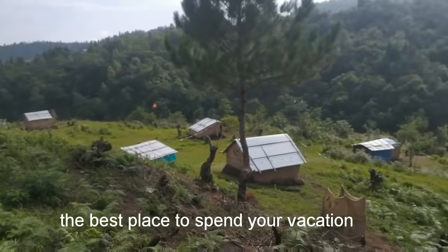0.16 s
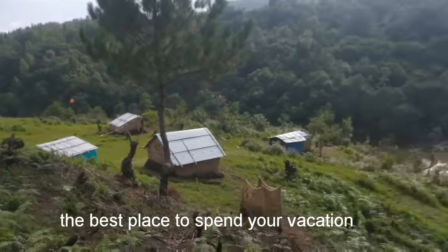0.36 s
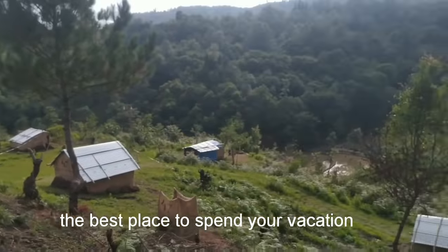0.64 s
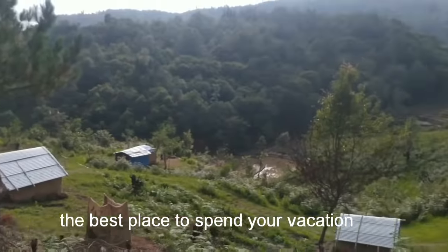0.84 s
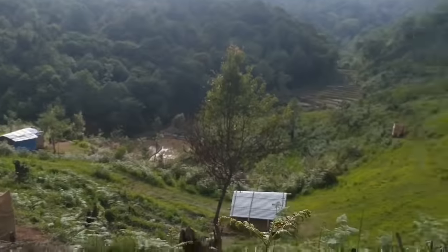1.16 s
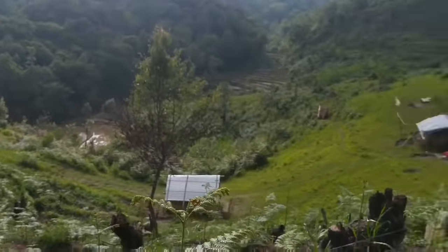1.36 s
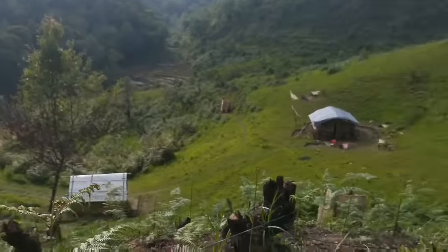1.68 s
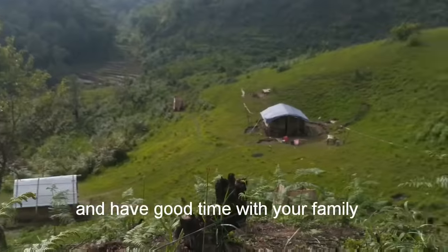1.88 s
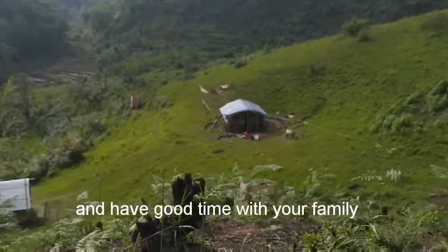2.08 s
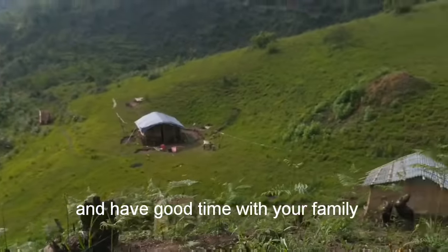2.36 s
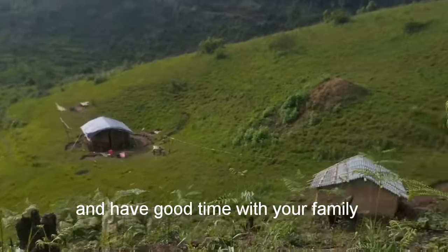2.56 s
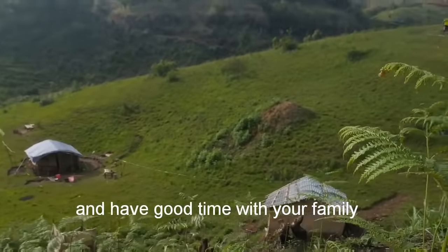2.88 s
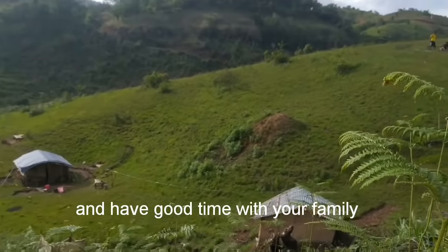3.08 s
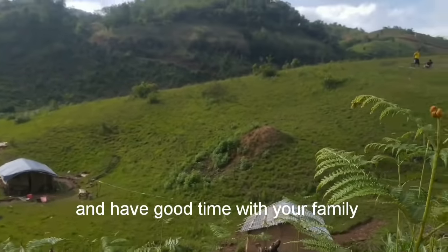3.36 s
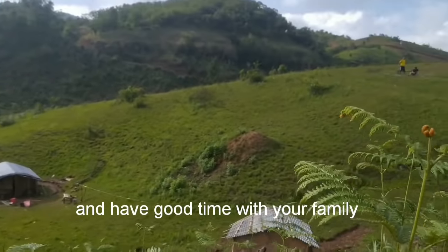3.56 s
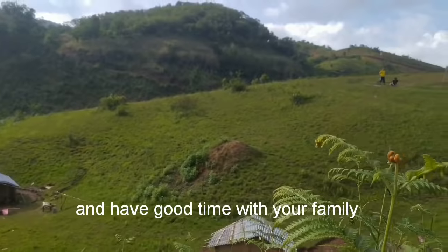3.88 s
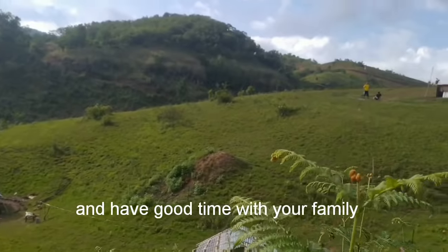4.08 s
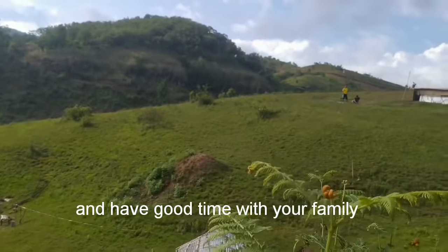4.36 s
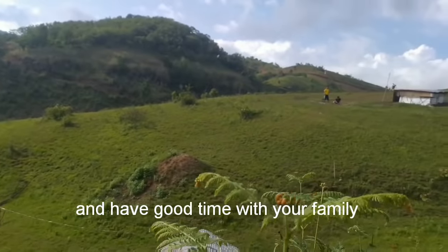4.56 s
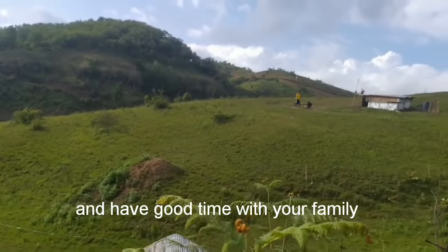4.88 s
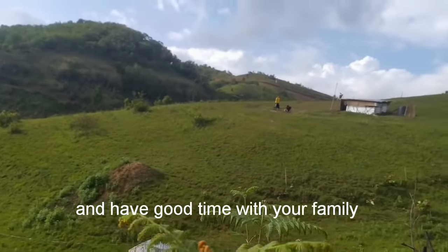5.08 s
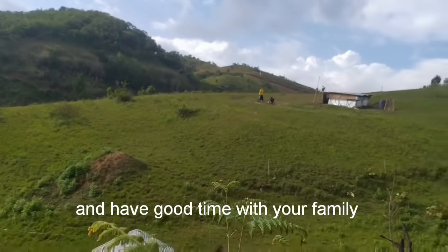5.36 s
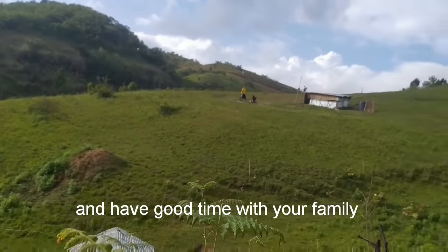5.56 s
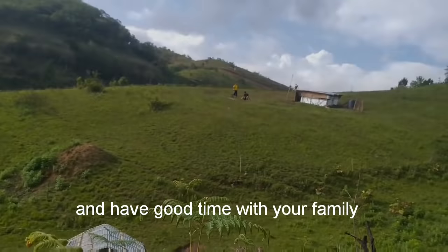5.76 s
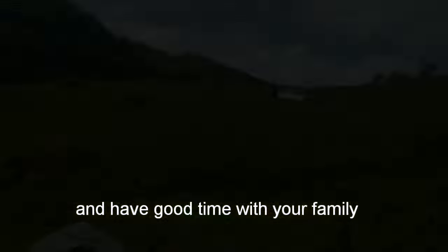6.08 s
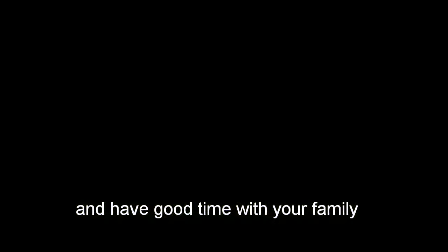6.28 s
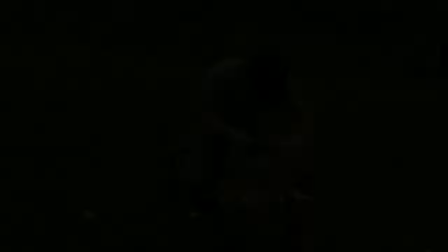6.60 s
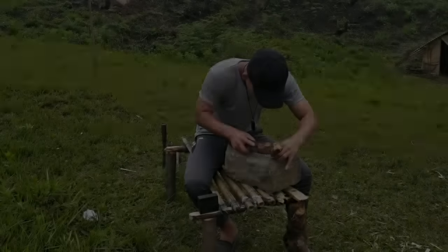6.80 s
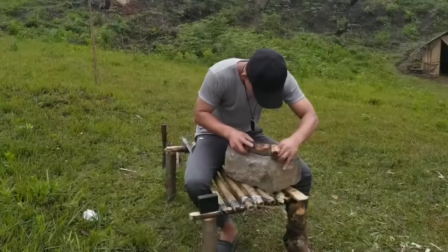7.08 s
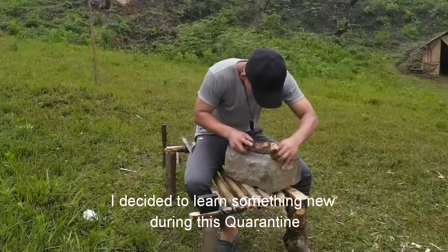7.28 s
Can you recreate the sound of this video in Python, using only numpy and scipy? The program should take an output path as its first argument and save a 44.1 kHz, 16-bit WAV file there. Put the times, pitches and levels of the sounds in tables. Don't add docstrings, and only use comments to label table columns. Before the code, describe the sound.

Many small birds chirp and whistle among trees, blurred by a soft leafy echo. A nearby bird cuts in with short rattling trills that climb in pitch, loudest the first time. The far chorus thins near the middle, then thickens again. A mellow hollow cuckoo calls high, low, high near the end, before a slower faint trill at left. Handheld microphone, quiet open air, slightly gritty treble.

```python
import sys
import numpy as np
from scipy import signal
from scipy.fft import rfft, irfft
from scipy.io import wavfile
from scipy.ndimage import uniform_filter1d, map_coordinates

SR = 44100
rng = np.random.default_rng(int(sys.argv[2]) if len(sys.argv) > 2 else 0)


def transcribe(signal):
    frames = np.atleast_2d(signal).T
    limited = np.clip(frames, -1, 1)
    pcm = np.round(limited * 32767).astype(np.int16)
    wavfile.write(sys.argv[1], SR, pcm)


def amplitude_ratio(level_db):
    exponent = np.asarray(level_db, float) / 20
    return 10 ** exponent


N = 328104


def rms_one(x):
    return x / np.sqrt(np.mean(x ** 2) + 1e-20)


def in_time(rows):
    s, level_db = np.transpose(rows)
    return np.interp(np.arange(N) / SR, s, level_db)


def drift(rate):
    r = np.exp(-80 * np.pi * rate / SR)
    slow = signal.lfilter([1], [1, -2 * r, r * r], rng.standard_normal(N // 40 + 2002))[2000:]
    return np.interp(np.arange(N) / 40, np.arange(len(slow)), rms_one(slow))


def add(out, start_s, hz, gain, octave_db):
    i = int(start_s * SR)
    phase = np.cumsum(2 * np.pi * hz / SR)
    tone = gain * (np.sin(phase) + amplitude_ratio(octave_db) * np.sin(2 * phase))
    tone = tone[:max(N - i, 0)]
    out[i:i + len(tone)] += tone


def place(x, pan_db):
    return x * amplitude_ratio(np.array([[pan_db / 2], [-pan_db / 2]]))


def woods(x, t60, gap_s):
    t = np.arange(int(t60 * SR)) / SR
    decay = amplitude_ratio(-60 * t / t60) * (1 - np.exp(-t / gap_s))
    mid, side = rng.standard_normal((2, len(t))) * decay
    tail = np.array([mid + 0.52 * side, mid - 0.4 * side])
    return signal.oaconvolve(x, tail / np.sqrt(np.sum(mid ** 2)), axes=1)[:, :N]


def trill(syllables, base_hz):
    # share of the way from one top to the next, pitch drop as share of the top,
    # level in dB, octave in dB.
    syllable_shape = [
        (0, 0, 1, -38),
        (.15, .035, -3.5, -40),
        (.3, .11, -5, -20),
        (.5, .21, -11.5, -11),
        (.67, .27, -16.5, -5),
        (.77, .2, -14.5, -12),
        (.86, .05, -8, -28),
        (0.999, 0, 0.5, -42),
    ]
    # delay in seconds, level in dB.
    echoes = [(.0045, -8.5), (.0095, -9), (.016, -18)]
    out = np.zeros(N)
    share, *shape = np.transpose(syllable_shape)
    for s, top_hz, peak_db, dimming, bright_db, slide, growth, turning_db in syllables:
        tops = np.r_[2 * s[0] - s[1], s, 2 * s[-1] - s[-2]] - .001
        t = np.arange(tops[0], tops[-1], 1 / SR)
        turn = np.interp(t, tops, np.arange(len(tops)))
        drop, shape_db, octave_db = [uniform_filter1d(np.interp(turn % 1, share, c), size=50) for c in shape]
        top = np.interp(t, s, top_hz)
        luck = [np.interp(t, s, row[:len(s)]) for row in rng.standard_normal((2, 12))]
        along = turn / len(s) - .55
        reach = np.clip(1 + growth * along + .12 * luck[0], .3, 1.5)
        opening = (turn - 1) / 0.37 + 1
        shutting = 1 - (turn - len(s)) / 0.54
        beak = np.clip(np.minimum(opening, shutting) * 2, 0, 1)
        hz = top * (1 - drop * reach * slide)
        throat_db = 11 * np.maximum(base_hz + 250 - hz, 0) / 1000
        gain = beak ** 2 * amplitude_ratio(np.interp(t, s, peak_db) + dimming * shape_db - throat_db)
        add(out, tops[0], hz, gain, octave_db + throat_db + bright_db + turning_db * along + 3.5 * luck[1])
    out = out * amplitude_ratio(2.0 * drift(180))
    return out + sum(amplitude_ratio(echo_db) * np.roll(out, int(lag * SR)) for lag, echo_db in echoes)


def near_trill():
    # top of a syllable in seconds, peak in dB.
    trill_bursts = [
        [(1.011, -44), (1.024, -33), (1.038, -26.5), (1.051, -21.5), (1.070, -22), (1.0915, -19.5),
         (1.111, -18), (1.134, -18), (1.156, -20.5), (1.180, -27)],
        [(2.579, -47), (2.591, -38), (2.605, -30), (2.621, -27), (2.640, -26), (2.659, -22.5), (2.682, -22.5),
         (2.703, -22.5), (2.723, -26)],
        [(3.813, -41), (3.826, -35), (3.839, -33), (3.857, -26), (3.874, -23), (3.891, -23), (3.907, -23),
         (3.928, -24), (3.947, -25), (3.967, -34.5)],
        [(4.946, -42), (4.958, -35), (4.972, -26.5), (4.986, -25), (5.004, -23), (5.022, -22.5), (5.041, -21),
         (5.061, -19.5), (5.081, -19.5), (5.102, -22.5)],
        [(5.226, -42), (5.239, -36), (5.253, -36.5), (5.271, -33), (5.289, -32.5), (5.308, -33), (5.327, -32.5),
         (5.348, -32.5), (5.371, -39)],
        [(6.183, -39), (6.196, -33), (6.209, -27.5), (6.225, -27), (6.245, -25), (6.263, -21), (6.283, -21),
         (6.311, -25), (6.334, -27)],
    ]
    end_top_hz = [3875, 3840, 3880, 3844, 3860, 3887]
    # share of the dimming between tops, octave in dB,
    # share of the slide, growth of the slide, change of the octave in dB through the burst.
    facings = [(1.0, 1, .9, .75, -2), (.45, -9, .75, .8, -16), (0.65, -12, .95, .4, 0),
               (1.05, 1.5, 1.0, .4, -2), (.95, -3, .95, .4, 0), (.8, 0, .82, .2, -7)]
    bursts = []
    uneven = rng.standard_normal((len(trill_bursts), 12))
    for rows, end_hz, facing, luck in zip(trill_bursts, end_top_hz, facings, uneven):
        s, peak_db = np.transpose(rows)
        u = np.linspace(0, 1, len(s))
        climb_hz = 470 * (1 - u ** 1.31)
        bursts.append((s, end_hz - climb_hz + 30.1 * luck[:len(u)], peak_db, *facing))
    return place(trill(bursts, base_hz=2930), -4.0) * amplitude_ratio(-3.0)


def slow_trill():
    # top of a syllable in seconds, top pitch in Hz, peak in dB.
    slow_tops = [(7.338, 2733, -48), (7.366, 2694, -45.5), (7.391, 2563, -47), (7.414, 2470, -51),
                 (7.435, 2575, -43)]
    burst = (*np.transpose(slow_tops), .8, -6, 1.05, -.3, 0)
    return place(trill([burst], base_hz=1920), 7.4) * amplitude_ratio(5.5)


def whistles(notes, edge_s, flutter_db, wobble):
    out = np.zeros(N)
    waver = 1 + wobble * drift(59.4)
    for start, end, first, middle, last, level_db in notes:
        u = np.linspace(0, 1, max(int((end - start) * SR), 8))
        hz = first * (1 - u) * (1 - 2 * u) + 4 * middle * u * (1 - u) + last * u * (2 * u - 1)
        edge = np.minimum(u, 1 - u) * (end - start) / edge_s
        swell = np.sin(np.pi / 2 * np.minimum(edge, 1)) ** 2
        hz = hz * np.resize(waver[max(int(start * SR), 0):], len(u))
        breath_db = level_db + 3.5 + 1.5 * u - 9.0 * (2 * u - 1) ** 4
        add(out, max(start, 0), hz, np.sqrt(2) * amplitude_ratio(breath_db) * swell, octave_db=-42.5)
    return out * amplitude_ratio(flutter_db * drift(87.0))


def slides(rows):
    return [(start, end, first, (first + last) / 2, last, db) for start, end, first, last, db in rows]


def bows(rows):
    return [(start, end, outer, middle, outer, db) for start, end, outer, middle, db in rows]


def sharp_cry():
    # start in seconds, end in seconds, first Hz, last Hz, level in dB.
    cry_slides = [
        (6.296, 6.308, 4950, 4450, -41),
        (6.303, 6.322, 4300, 3400, -40),
    ]
    return whistles(slides(cry_slides), 0.0025, 4.5, 0.03)


def left_whistlers():
    # start in seconds, end in seconds, first Hz, last Hz, level in dB.
    left_slides = [(0, .033, 4830, 4610, -54.5), (.028, .097, 1530, 1634, -60.5),
                   (.76, .82, 2305, 2400, -60), (1.523, 1.572, 2480, 2680, -50),
                   (1.458, 1.49, 2480, 3150, -55), (1.485, 1.525, 3150, 3400, -59),
                   (1.47, 1.51, 2480, 2750, -58), (1.735, 1.76, 3420, 3300, -53),
                   (1.775, 1.82, 3450, 3250, -54), (1.51, 1.56, 4250, 3500, -64),
                   (1.819, 1.875, 3330, 3250, -51), (1.79, 1.894, 2880, 3150, -62),
                   (1.886, 1.934, 3092, 2650, -57.5), (2.405, 2.46, 2980, 2600, -57),
                   (3.3, 3.355, 3410, 3160, -62.5), (3.816, 3.87, 2144, 2430, -48.5),
                   (3.868, 3.905, 2400, 2050, -47), (4.0, 4.06, 1897, 2050, -52),
                   (4.145, 4.2, 2255, 2210, -40), (4.254, 4.398, 1980, 1928, -60.5),
                   (4.435, 4.475, 3110, 2840, -59.5), (4.541, 4.68, 1860, 1736, -62),
                   (4.64, 4.694, 2098, 2347, -43.5), (4.774, 4.871, 2340, 2574, -56.5),
                   (4.866, 4.947, 2029, 2353, -51), (6.071, 6.195, 2476, 2065, -65.5)]
    # start in seconds, end in seconds, outer Hz, middle Hz, level in dB.
    left_bows = [(.141, .213, 2910, 2657, -46.5), (.504, .584, 3220, 3360, -54),
                 (1.237, 1.325, 2660, 2738, -48), (1.315, 1.42, 2710, 2750, -56),
                 (.0, .11, 3170, 3150, -64), (2.054, 2.114, 2930, 2592, -48.5),
                 (2.118, 2.265, 3030, 3124, -53), (2.452, 2.505, 2680, 2540, -56),
                 (3.915, 3.969, 1832, 2013, -50), (4.115, 4.157, 2315, 2196, -47),
                 (4.184, 4.262, 2076, 1905, -47.5), (4.462, 4.505, 2824, 2719, -44),
                 (4.905, 4.945, 2780, 2990, -53), (3.97, 4.0, 1884, 2056, -50),
                 (4.591, 4.648, 2135, 2070, -58), (4.686, 4.793, 2310, 2333, -50.5),
                 (7.081, 7.133, 1750, 1830, -60), (7.108, 7.2, 3066, 3133, -54),
                 (7.162, 7.24, 2374, 2355, -52), (7.19, 7.34, 3030, 3050, -64)]
    return place(whistles(slides(left_slides) + bows(left_bows), 0.0077, 2.1, 0.0045), 5.6)


def right_whistlers():
    # start in seconds, end in seconds, first Hz, last Hz, level in dB.
    right_slides = [(.275, .34, 2060, 2180, -51), (.19, .27, 2180, 2050, -55),
                    (.438, .525, 2336, 2130, -45), (.455, .558, 2650, 2720, -55.5),
                    (.55, .6, 2750, 2920, -52), (.59, .65, 2850, 3480, -46), (.64, .716, 3420, 3730, -43),
                    (.71, .82, 3720, 3680, -58), (3.408, 3.478, 2930, 3200, -59.5),
                    (4.623, 4.665, 2490, 2560, -53.5), (4.805, 4.86, 3350, 2626, -51),
                    (5.728, 5.884, 2148, 2218, -56.5), (5.763, 5.79, 5000, 4900, -65),
                    (5.793, 5.825, 4930, 4800, -60), (6.936, 7.019, 1400, 1573, -64.5),
                    (6.95, 7.008, 4960, 4750, -61), (7.245, 7.307, 1590, 1294, -59),
                    (7.338, 7.41, 4930, 4740, -53)]
    # start in seconds, end in seconds, outer Hz, middle Hz, level in dB.
    right_bows = [(.128, .195, 2085, 2236, -43), (.315, .39, 2200, 2036, -55),
                  (5.505, 5.555, 2325, 2236, -45), (5.588, 5.73, 2197, 2119, -45),
                  (6.837, 6.903, 2740, 2860, -59.5), (7.014, 7.095, 1580, 1727, -60.5),
                  (.245, .41, 3900, 3820, -64)]
    return place(whistles(slides(right_slides) + bows(right_bows), 0.016, 1.0, 0.003), -6.0)


def throb():
    # start in seconds, end in seconds, beats per second, depth from 0 to 1.
    throbbing = (5.232, 5.6, 31, .3)
    t = np.arange(N) / SR
    start, end, rate, depth = throbbing
    return 1 - depth * np.sin(np.pi * rate * (t - start)) ** 2 * (t > start) * (t < end)


def ahead_whistlers():
    # start in seconds, end in seconds, first Hz, last Hz, level in dB.
    ahead_slides = [(.1, .21, 7040, 6890, -60), (.283, .33, 4960, 4700, -50.5),
                    (.32, .483, 4710, 4670, -54), (4.985, 5.03, 2205, 1743, -50.5),
                    (.562, .674, 2090, 1986, -60), (2.042, 2.1, 3325, 2840, -52),
                    (2.216, 2.265, 3200, 2880, -64), (2.43, 2.46, 3420, 3640, -63),
                    (2.455, 2.5, 3640, 3480, -60), (2.27, 2.32, 3520, 3620, -59),
                    (2.33, 2.365, 3500, 3440, -59), (2.59, 2.64, 2250, 2500, -56),
                    (4.935, 5.0, 2200, 2287, -43), (5.28, 5.35, 1790, 1715, -45.5),
                    (5.34, 5.41, 1760, 1720, -47), (5.45, 5.5, 1740, 1760, -55),
                    (5.49, 5.612, 1785, 1620, -54), (5.85, 5.922, 5160, 4840, -58),
                    (6.4, 6.5, 4980, 4780, -68), (6.575, 6.625, 3250, 3030, -61),
                    (6.195, 6.31, 1718, 2007, -50), (6.852, 6.912, 4770, 4880, -58.5),
                    (7.235, 7.345, 2330, 1960, -57), (7.345, 7.41, 1930, 1700, -54),
                    (7.128, 7.162, 1800, 1580, -57)]
    # start in seconds, end in seconds, outer Hz, middle Hz, level in dB.
    ahead_bows = [(0, .108, 6950, 7003, -52.5), (0, .065, 2840, 2616, -57.5),
                  (.185, .254, 1970, 2100, -50.5), (.218, .26, 4000, 3900, -61),
                  (4.835, 4.94, 2200, 1720, -50), (.505, .6, 2070, 1842, -46.5),
                  (5.11, 5.205, 2150, 1744, -62.5), (.862, 1.015, 3100, 3022, -52),
                  (.832, .862, 3250, 3230, -57), (4.521, 4.619, 2660, 2586, -63),
                  (5.236, 5.26, 1750, 1880, -49), (5.258, 5.286, 1720, 1890, -46),
                  (5.405, 5.452, 1700, 1880, -48)]
    return throb() * whistles(slides(ahead_slides) + bows(ahead_bows), 0.011, 2.1, 0.004)


def chips():
    # start in seconds, end in seconds, first Hz, last Hz, level in dB.
    chip_slides = [(1.38, 1.42, 2040, 1615, -63.5), (1.67, 1.74, 4180, 3400, -60),
                   (1.6, 1.64, 4400, 4000, -68), (1.88, 1.91, 2080, 2020, -65),
                   (1.505, 1.555, 1850, 1780, -70), (2.18, 2.215, 2500, 2950, -62),
                   (2.29, 2.33, 2650, 2900, -64), (2.29, 2.335, 2400, 2330, -69),
                   (.985, 1.0, 5000, 5250, -63), (2.875, 2.915, 2680, 2620, -66),
                   (3.225, 3.265, 2150, 2400, -73), (2.76, 2.83, 1880, 1780, -69.5),
                   (3.31, 3.34, 2300, 1560, -63), (3.335, 3.387, 1620, 1550, -73.5),
                   (3.52, 3.545, 2130, 1740, -64), (3.645, 3.68, 2000, 1700, -63.5),
                   (4.24, 4.265, 3840, 3560, -61), (4.335, 4.35, 2750, 3200, -55.5),
                   (4.368, 4.388, 3220, 2520, -57), (6.62, 6.668, 2820, 2650, -53),
                   (6.17, 6.2, 2830, 2790, -46.5), (6.43, 6.467, 3100, 3200, -60.5),
                   (6.035, 6.1, 2760, 2740, -59), (6.393, 6.425, 2330, 2280, -58),
                   (6.735, 6.77, 2050, 1550, -68), (5.182, 5.203, 5030, 5000, -70),
                   (5.505, 5.525, 5300, 4950, -62), (2.53, 2.555, 4000, 4030, -67),
                   (2.375, 2.41, 4200, 4330, -72), (3.78, 3.795, 3150, 2830, -56.5),
                   (4.01, 4.09, 4430, 4320, -71), (4.07, 4.09, 2400, 2200, -55),
                   (1.305, 1.345, 1850, 1800, -68), (1.512, 1.525, 2800, 2700, -52),
                   (5.88, 5.91, 3100, 3350, -64), (5.71, 5.75, 4400, 4250, -68),
                   (5.49, 5.63, 4350, 4380, -70.5), (2.493, 2.525, 2600, 3250, -61),
                   (3.184, 3.2, 3000, 2900, -62), (3.411, 3.423, 2950, 2900, -55),
                   (3.5, 3.522, 1900, 2100, -70), (6.31, 6.4, 2310, 2700, -55.5),
                   (7.005, 7.035, 2710, 2300, -51), (7.424, 7.44, 4300, 4150, -60),
                   (6.69, 6.73, 2450, 2350, -66), (5.6, 5.625, 3550, 3500, -64),
                   (5.955, 5.99, 3000, 3050, -65)]
    return place(whistles(slides(chip_slides), 0.0046, 1.3, 0.0088), 2.4)


def cuckoo():
    # start in seconds, end in seconds, top Hz, peak in dB, sag at the ends as share.
    cuckoo_notes = [
        (4.595, 4.647, 665, -66, 0.19),
        (4.945, 5.158, 512.4, -48, 0.017),
        (5.955, 6.043, 670.4, -34.5, 0.2),
        (6.345, 6.56, 513, -38.5, 0.024),
        (7.341, 7.429, 663.6, -32.5, 0.191),
    ]
    out = np.zeros(N)
    for start, end, top_hz, peak_db, sag in cuckoo_notes:
        u = np.linspace(0, 1, int((end - start) * SR))
        rise = np.maximum(1 - u / 0.41, 0)
        fall = np.maximum(1 - (1 - u) / 0.28, 0)
        fade = np.minimum(np.minimum(u, 1 - u) * (end - start) / 0.0036, 1)
        gain = np.sqrt(2) * amplitude_ratio(peak_db - 20 * rise ** 2 - 12 * fall ** 2) * fade
        add(out, start, top_hz * (1 - sag * (2 * u - 1) ** 2), gain, octave_db=-43.5)
    return place(out, -1.5)


def hidden_singers():
    # start in seconds, end in seconds, first Hz, last Hz, level in dB.
    hidden_slides = [(1.47, 1.6, 2750, 3150, -57), (1.98, 2.04, 3430, 3140, -56.5),
                     (1.34, 1.4, 4255, 3466, -60.5), (1.57, 1.72, 2634, 2580, -68),
                     (1.72, 1.79, 4330, 4045, -64.5), (1.91, 2.01, 5330, 4910, -68),
                     (1.96, 2.04, 4480, 4230, -62.5), (2.22, 2.3, 3390, 3650, -64),
                     (2.3, 2.36, 3660, 3455, -65.5), (2.94, 2.975, 3410, 3180, -69),
                     (3.07, 3.12, 3690, 3285, -69.5), (3.07, 3.12, 2750, 2520, -70),
                     (3.365, 3.41, 3980, 4050, -72.5), (3.415, 3.5, 2765, 2500, -71),
                     (3.71, 3.8, 2880, 2830, -68.5), (6.05, 6.125, 2250, 2380, -53),
                     (6.65, 6.77, 3588, 3476, -64), (6.77, 6.85, 4420, 4960, -71.5),
                     (6.91, 7.02, 4030, 3700, -66)]
    return woods(place(whistles(slides(hidden_slides), 0.0026, 5.55, 0.0286), 1.0), 0.2, 0.00028)


def far_birds(low_hz, high_hz, count):
    start, pitch, slide, length, size, side = rng.random((count, 6)).T
    first = low_hz * (high_hz / low_hz) ** pitch
    last = np.clip(first * (1.12 - .3 * slide), low_hz, high_hz)
    start_s = start * N / SR
    end_s = start_s + 0.0138 + 0.0395 * length
    notes = np.transpose([start_s, end_s, first, (first + last) / 2, last, 2.5 * size])
    dry = place(whistles(notes[side < .55], 0.0035, 6.5, 0.0202), 2.3)
    dry = dry + place(whistles(notes[side >= .55], 0.012, 4.6, 0.0198), -1.5)
    heard = woods(dry, 0.32, 0.0022) + amplitude_ratio(-8.0) * woods(dry, 0.13, 0.042)
    return heard / np.sqrt(uniform_filter1d(np.mean(heard ** 2, axis=0), size=SR // 8))


def far_chorus():
    # time in seconds, level in dB.
    low_flock = [(0, -64.5), (.3, -51), (1.3, -65.5), (1.5, -75), (2.85, -81), (3.15, -99), (3.62, -99),
                 (3.8, -66.5), (4.1, -57), (5.2, -54.5), (6.1, -55.5), (6.9, -67.5), (7.44, -47.5)]
    high_flock = [(0, -60), (.3, -55), (1.3, -53.5), (1.43, -60), (1.5, -52), (2.4, -58.5), (2.85, -59.5),
                  (3.15, -68.5), (3.35, -63.5), (3.62, -82.5), (3.8, -61), (4.1, -63), (4.6, -76.5),
                  (5.2, -51.5), (5.6, -63.5), (6.9, -58.5), (7.44, -58)]
    low = amplitude_ratio(in_time(low_flock)) * far_birds(1850, 2500, count=300)
    high = amplitude_ratio(in_time(high_flock)) * far_birds(2450, 4000, count=650)
    return low + high


def band_noise(low_hz, high_hz):
    band = signal.butter(2, [low_hz, high_hz], "band", fs=SR, output="sos")
    return signal.sosfilt(band, rng.standard_normal((2, N)))


def low_murmur():
    # time in seconds, level in dB.
    murmur = [(4.8, -87), (5.5, -82), (6.1, -74.5), (6.6, -72.5), (7.44, -76.5)]
    mid, side = band_noise(300, 850)
    return rms_one(np.array([mid + 0.27 * side, mid - 0.2 * side])) * amplitude_ratio(in_time(murmur) + 2.0 * drift(14))


def air():
    # frequency in Hz, spectrum level in dB.
    air_spectrum = [(18, -62), (30, -43), (420, -34), (996, -13), (1590, -10), (1870, -6), (11700, -25),
                    (12500, -38)]
    hz, level_db = np.transpose(air_spectrum)
    gain = amplitude_ratio(np.interp(np.log(np.arange(1, N // 2 + 2) * SR / N), np.log(hz), level_db))
    mid, side = irfft(rfft(rng.standard_normal((2, N))) * gain, N)
    return amplitude_ratio(-73) * rms_one(np.array([mid + 0.49 * side, mid - 0.24 * side]))


def handling():
    # time in seconds, wind level in dB.
    gust = [(0, -104), (.5, -92.5), (1.0, -92), (7.12, -117), (7.18, -72), (7.44, -73)]
    mid, side = band_noise(35, 220)
    wind = rms_one(np.array([mid + 0.59 * side, mid - 0.52 * side])) * amplitude_ratio(in_time(gust) + 1.06 * drift(30))
    t = np.maximum(np.arange(N) / SR - 7.349, 0)
    burst = rng.standard_normal(N) * (t > 0) * np.exp(-t / .0012)
    tick = signal.lfilter([.45], [1, -.55], burst)
    return wind + amplitude_ratio(-32) * tick


def scene():
    near = near_trill() + slow_trill() + sharp_cry()
    near = near + amplitude_ratio(-11.0) * woods(near, 0.1, 0.003)
    singers = left_whistlers() + right_whistlers() + ahead_whistlers() + chips()
    singers = amplitude_ratio(-0.5) * singers + amplitude_ratio(-8) * woods(singers, 0.13, 0.003)
    singers = singers + hidden_singers()
    low_call = cuckoo()
    tails = amplitude_ratio(-12.0) * woods(singers, 0.93, 0.005)
    tails = tails + amplitude_ratio(-14.0) * woods(near, 0.35, 0.0014)
    tails = tails + amplitude_ratio(-18.5) * woods(low_call, 0.28, 0.008)
    return near + singers + low_call + tails + far_chorus() + low_murmur() + air() + handling()


def low_pass(x):
    return signal.sosfilt(signal.butter(12, 15720, fs=SR, output="sos"), x)


def record(dry):
    source_rate_hz, slip_rate_hz = 47973, 3873
    slip = ((np.arange(N) * slip_rate_hz / SR) % 1 - .5) * SR / source_rate_hz
    read = np.array([map_coordinates(side, [np.arange(N) + slip], order=3, mode="nearest") for side in dry])
    return low_pass(read)


dry = scene()
out = record(dry)
transcribe(out)
```